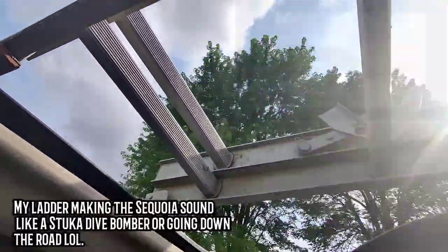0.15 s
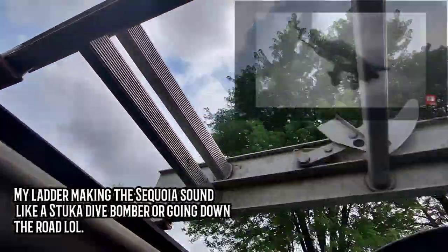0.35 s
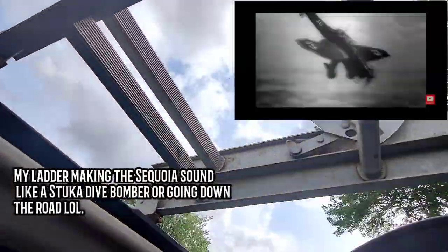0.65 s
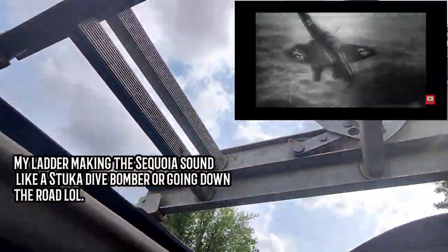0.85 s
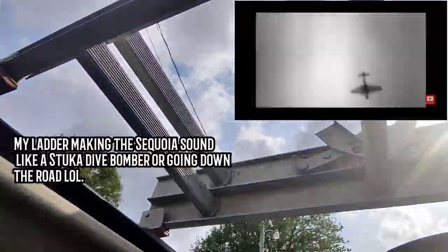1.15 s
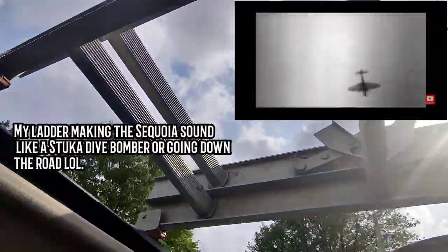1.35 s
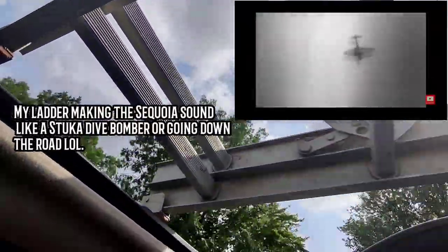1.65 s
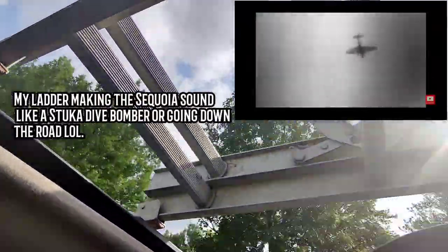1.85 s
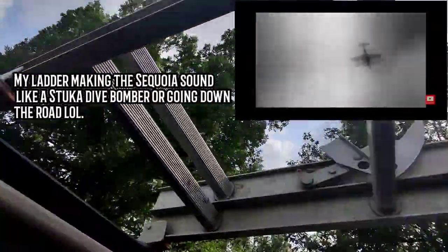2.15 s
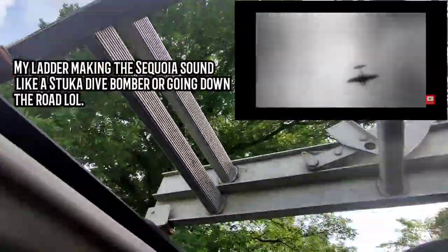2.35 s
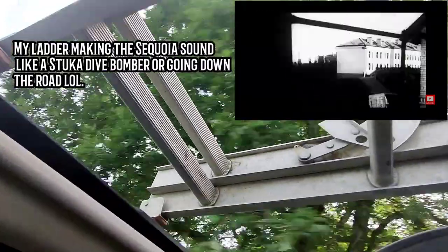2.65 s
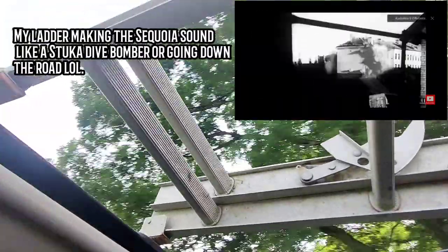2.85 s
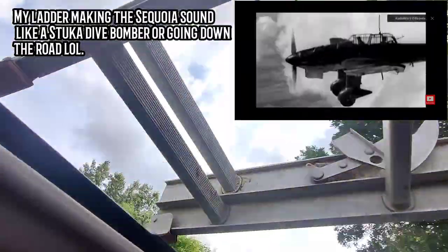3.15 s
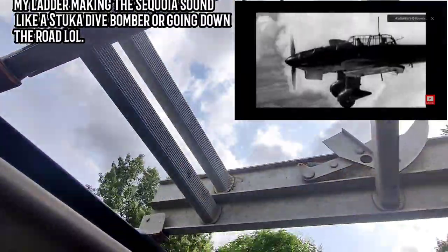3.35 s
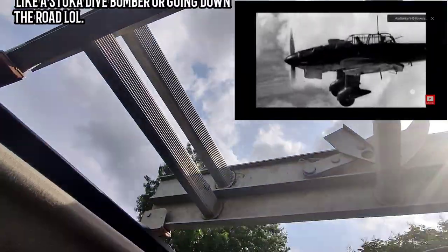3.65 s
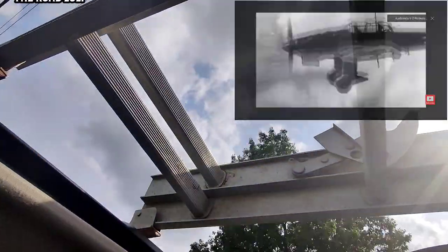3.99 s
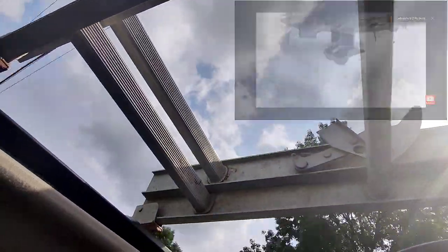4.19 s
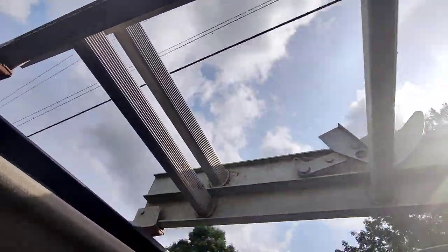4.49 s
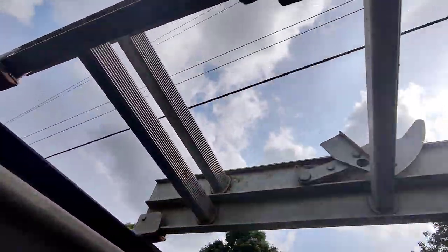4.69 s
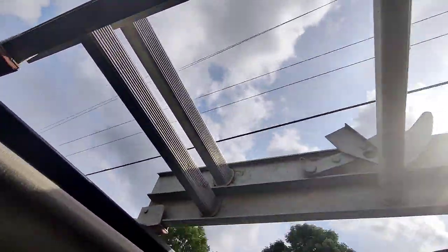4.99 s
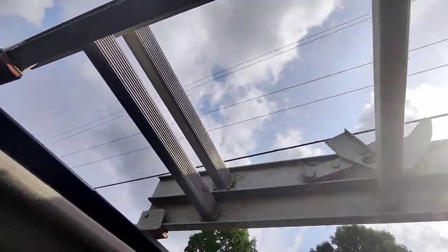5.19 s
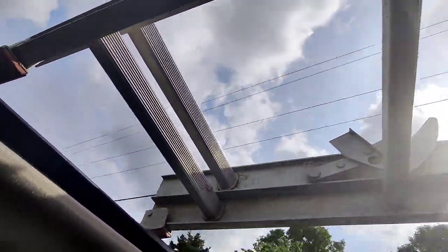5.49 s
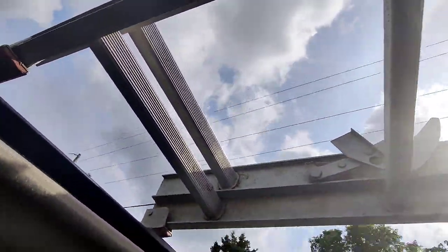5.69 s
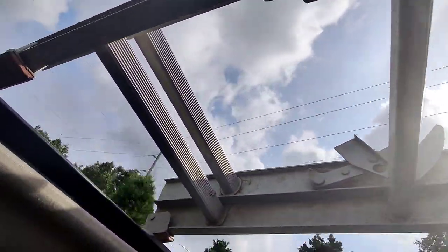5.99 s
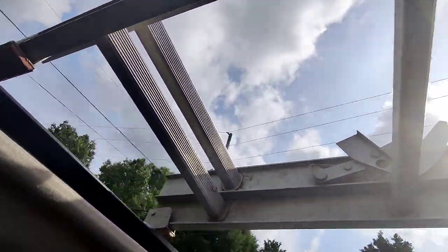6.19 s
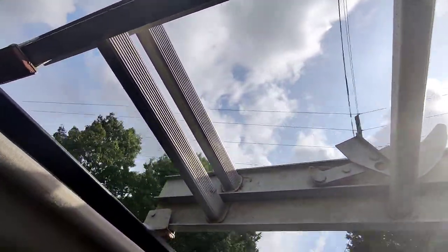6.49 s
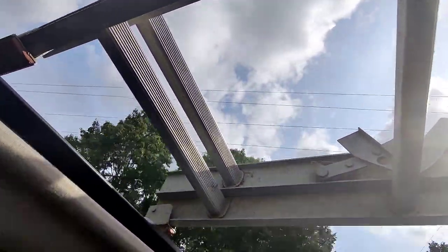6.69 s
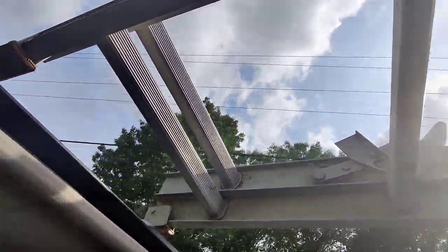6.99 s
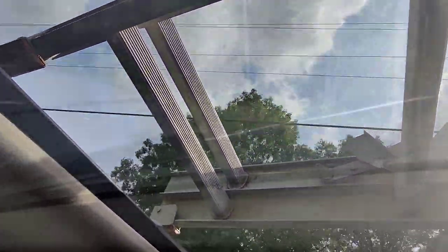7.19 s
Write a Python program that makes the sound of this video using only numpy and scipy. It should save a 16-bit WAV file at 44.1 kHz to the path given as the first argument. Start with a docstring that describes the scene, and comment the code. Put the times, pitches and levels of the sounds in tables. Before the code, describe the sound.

Wind through a ladder on a moving car's roof sings a steady, slowly beating mid-low whistle over road rumble, rushing air and increasingly hard wind thumps.

```python
"""Wind sings through the rungs of an aluminium ladder on the roof of a moving car, heard by a phone at the open sunroof.
From the start two rungs beat slowly in one whistle, two drifting tones with a fluttering octave, over tyre roar, rumble
and rushing air, all shaped noise. A low drone sinks as the car slows slightly, fades, and swells again past four seconds.
Gusts heave the air and dip the level; eddies buffet the two microphone ports as noise thumps, and from 1.5 s on some
slap them with one quick swing of pressure, most often after four seconds."""
import sys
import numpy as np
from scipy import signal
from scipy.fft import rfft, irfft
from scipy.io import wavfile
from scipy.ndimage import uniform_filter1d

SR = 44100
rng = np.random.default_rng(int(sys.argv[2]) if len(sys.argv) > 2 else 0)


def store_pcm(level_fs):
    """Save levels as 16-bit WAV."""
    pcm = np.round(np.clip(level_fs, -1, 1) * 32767).astype(np.int16)
    wavfile.write(sys.argv[1], SR, np.atleast_2d(pcm).T)


N = 323635
TIME = np.arange(N) / SR
FREQS = np.maximum(np.fft.rfftfreq(N, 1 / SR), 1)

# Gusts that heave the cabin air. Each row: centre in seconds, level in dB before the rumble's colour,
# length at half power in seconds, left minus right in dB, depth in dB of the dip in the whole sound.
GUSTS = [(.28, -21, 0.065, 10, 0), (0.99, -12.5, 0.04, -2, 0.5), (1.31, -16, .1, 3, 1),
         (1.535, -10, 0.11, -11, 5), (1.679, -8, 0.045, 5, 4.5), (1.778, -15, 0.053, 7, 4),
         (2.304, -10.5, 0.055, -4, 2), (2.97, -12, 0.044, -8, 1), (3.117, -28, .05, -8, 1.5),
         (3.272, -15, 0.13, 15.5, 1.5), (3.42, -19.5, 0.11, -10, 4), (3.619, -14.5, 0.062, 12, -2),
         (3.953, -14, 0.054, 1, 2), (4.067, -14.5, 0.094, -10.5, 4), (4.248, -16, 0.077, -7, 3),
         (4.599, -16.5, 0.1, -2, 3), (4.88, -12, 0.052, 0, 2), (5.114, -9, 0.057, -8, 3),
         (5.24, -11, 0.15, -5, 2.5), (5.362, -26, 0.048, -8, 2.5), (5.485, -16, 0.024, -10, 2.5),
         (5.816, -15.5, 0.045, -20, 4.5), (6.13, -14, 0.14, -10, 4.5), (6.571, -20, 0.0594, -15, 1.5),
         (6.706, -14, 0.076, -2, 4), (7.018, -15, 0.28, -1, 3.5)]


def undb(db):
    """Decibels to gain."""
    return 10 ** (np.asarray(db) / 20)


def curves(table):
    """The columns of a table, joined by straight lines in time."""
    s, *columns = np.transpose(table)
    return [np.interp(TIME, s, c) for c in columns]


def colour(table):
    """Gain at every frequency, one row for each dB column."""
    hz, *columns = np.transpose(table)
    return undb([np.interp(np.log(FREQS), np.log(hz), c) for c in columns])


def unit(x):
    """Scale to rms 1."""
    return x / np.sqrt(np.mean(x ** 2))


def even(x, size):
    """Hold the rms near 1 over every stretch of size samples."""
    return x / np.sqrt(uniform_filter1d(x ** 2, size=size, axis=-1))


def pan(db):
    """Left and right gains for a level difference."""
    return undb(np.array([[1], [-1]]) * db / 2)


def walk(rate):
    """Smooth random drift of rms 1, with little movement faster than rate in Hz."""
    return unit(irfft(rfft(rng.standard_normal(N)) / (1 + (FREQS / rate) ** 4), N))


def port_noise(gain, likeness, port_lag_s=0.00029):
    """Coloured noise at the two ports; likeness is the share of power in common, which reaches the right first."""
    shared, left, right = rfft(rng.standard_normal((3, N)))
    c = np.clip(likeness, 0, 1)
    arrival = np.exp(-2j * np.pi * FREQS * np.array([[port_lag_s], [0]]))
    common = np.sqrt(c) * shared * arrival
    separate = np.sqrt(1 - c) * np.array([left, right])
    return irfft(gain * (common + separate), N)


def swell(s, db, length, pan_db):
    """Power at the two ports of one rounded swell of wind; length spans its half-power points."""
    return (undb(db) * pan(pan_db)) ** 2 / (1 + (2 * (TIME - s) / length) ** 4)


def husk(phase, width_hz):
    """A narrow band of turbulence that rides on a tone."""
    return walk(width_hz) * np.cos(phase) + walk(width_hz) * np.sin(phase)


def road(centre_hz=235, width_hz=80, likeness=0.6, pan_db=-2.5):
    """The tyres roar in the cabin's low resonance: a noise band, louder on coarse stretches of road."""
    # Roar of the tyres. Each row: time in seconds, level in dB.
    roar_levels = [(0, -33.5), (.9, -34.5), (1.9, -36), (2.3, -33.5), (3.2, -34), (3.9, -36), (4.4, -40.5),
                   (5.2, -40), (6.1, -34), (7.34, -39.5)]
    db, = curves(roar_levels)
    band = 1 / (1 + ((FREQS - centre_hz) / width_hz) ** 2) ** 2
    return unit(port_noise(band, likeness)) * undb(db) * pan(pan_db)


def rumble(steady_db=-19.5, steady_pan_db=-4.0, likeness=0.4, heave_db=-0.1, gust_top_hz=95):
    """Air in the cabin heaves with the turbulence over the opening; gusts swell only its deepest part."""
    # Colour of the rumble. Each row: frequency in Hz, relative level in dB (the noise is evened afterwards).
    rumble_colour = [(4, -32), (12, -6.5), (25, 7), (38, 11.5), (50, 2.5), (65, -13), (95, -9.5),
                     (135, -11.5), (180, -26), (300, -32), (600, -28), (2000, -81)]
    heave = heave_db * np.array([walk(1.9), walk(2.3)])
    steady = undb(steady_db + heave) * pan(steady_pan_db)
    gust_power = sum(swell(s, db, length, pan_db) for s, db, length, pan_db, _ in GUSTS)
    gusty = np.sqrt(steady ** 2 + gust_power)
    air = even(port_noise(colour(rumble_colour), likeness), size=4000)
    deep = irfft(rfft(air) / (1 + (FREQS / gust_top_hz) ** 4), N)
    return deep * gusty + (air - deep) * steady


def roof_echoes(echo_db=-19, decay_s=0.0098):
    """Fine ripple that close reflections from roof and ladder put on each port's response."""
    tail = rng.standard_normal((2, N)) * np.exp(-TIME / decay_s)
    tail = tail / np.sqrt(np.sum(tail ** 2) / 2)
    return np.abs(1 + undb(echo_db) * rfft(tail))


def rush(shared_hz=1100, likeness=0.65, flicker_db=0.49, swirl_db=1.0, swirl_hz=2200):
    """Broad noise of air over the opening, alike at both ports in the bass, coloured by each port's cavity."""
    # Gain of the rush over its colour. Each row: time in seconds, gain in dB.
    rush_levels = [(0, 1.7), (1.0, 1), (1.45, 3.5), (2, 1), (3, 2), (3.8, 3), (4.3, 1.5), (5.05, 3.5),
                   (5.6, 1.1), (6.1, 1.5), (6.6, 2), (7.34, 1.5)]
    # Colour before echoes, resonances and gain. Each row: frequency in Hz, left and right in dB per Hz.
    rush_colour = [(61.3, -45, -41), (157, -61.5, -51.5), (253, -61, -59), (347, -67.5, -61),
                   (476, -63.5, -61.5), (610, -66.5, -65.5), (884, -63.5, -61.5), (973, -68, -66.5),
                   (1660, -75, -74.5), (1970, -77.5, -76), (2780, -84.5, -79.5), (3700, -84, -79.5),
                   (5520, -82, -80.5), (7960, -87.5, -92.5), (13900, -99.5, -91.5)]
    # Resonances of the ports. Each row: centre in Hz, width in Hz, boost at left and at right in dB.
    port_modes = [(1690, 48, 5.5, 1), (1955, 68, 4.5, 0.5), (2250, 540, 3.5, 4), (2890, 350, 2.5, 3.5),
                  (6424, 1370, -2.5, 13.5), (7300, 670, 4, -1.5)]
    db, = curves(rush_levels)
    gain = colour(rush_colour) * roof_echoes()
    for hz, width, left_db, right_db in port_modes:
        peak = 1 / (1 + (2 * (FREQS - hz) / width) ** 2)
        gain = gain * undb(np.array([[left_db], [right_db]]) * peak)
    # sqrt(SR / 2) turns levels per Hz into gains on white noise
    air = port_noise(gain * np.sqrt(SR / 2), likeness / (1 + (FREQS / shared_hz) ** 4))
    # large eddies stir the low part; the hiss stays smooth
    low = irfft(rfft(air) / (1 + (FREQS / swirl_hz) ** 2), N)
    air = air - low + low * undb(swirl_db * walk(36))
    return air * undb(db + flicker_db * walk(28))


def hum(waver_hz=0.32, throb_db=1.4, cabin_hz=238, cabin_width_hz=7, cabin_db=-38, torn_db=-22):
    """A low drone that throbs and tears in the wind; its octave booms when it passes a cabin resonance."""
    # Low hum of the car. Each row: time in seconds, pitch in Hz, level in dB before the throb.
    drone_path = [(0, 124.2, -19.5), (.65, 123.5, -21), (.95, 123.3, -24.5), (1.12, 123.2, -22.5),
                  (1.48, 123, -22.5), (1.72, 122.5, -36), (2.15, 121.3, -26.5), (2.9, 120, -31),
                  (3.4, 118.8, -34), (4.0, 117, -37), (4.4, 115.7, -26.5), (5.0, 114.8, -19.5),
                  (5.6, 113.7, -21.5), (6.1, 112.8, -20.5), (6.6, 111.8, -22.5), (7.05, 110.2, -22.5),
                  (7.34, 110, -19.5)]
    hz, db = curves(drone_path)
    phase = 2 * np.pi * np.cumsum(hz + waver_hz * walk(5.3)) / SR
    drone = undb(db + throb_db * walk(31)) * (np.sin(phase) + undb(torn_db) * husk(phase, 45))
    resonance = 1 / np.hypot(1, 2 * (2 * hz - cabin_hz) / cabin_width_hz)
    boom = undb(cabin_db + 2.6 * walk(5.3)) * resonance * np.sin(2 * phase)
    return np.sqrt(2) * (drone + boom)


def eddy_force():
    """Pressure of all the eddies at each port, their powers summed."""
    # Eddies that strike a port. Each row: centre in seconds, level in dB before colour and trim,
    # length at half power in seconds, left minus right in dB.
    eddies = [(0.248, -23.5, 0.025, -10), (1.54, -30.5, 0.026, -20), (1.569, -23.5, 0.023, -23),
              (1.607, -18.5, 0.03, 1), (1.754, -24.5, 0.051, 5), (1.806, -22, 0.075, -8),
              (2.206, -24.5, 0.036, -16), (2.276, -26.5, 0.026, -10), (2.462, -25, 0.028, -9),
              (2.596, -28, 0.034, 14), (3.12, -28, 0.063, -12), (3.232, -33, 0.031, 7),
              (3.27, -31, 0.053, 9), (3.343, -27.5, 0.028, -7), (3.617, -28, 0.045, 6),
              (3.837, -31, 0.022, -14), (4.098, -23.5, 0.059, -17), (4.11, -26, 0.023, -18),
              (4.824, -23, 0.032, -6), (5.08, -25, .025, -9), (5.13, -24.5, 0.085, -5),
              (5.282, -23, 0.033, -4), (5.353, -31, 0.054, 10), (5.491, -24.5, .02, -20),
              (5.63, -22, 0.032, -11), (5.758, -22, 0.027, -11), (5.823, -19, 0.047, -13),
              (5.912, -23, .02, -9), (6.112, -24, 0.025, -14), (6.167, -22.5, 0.024, -18),
              (6.294, -17.5, 0.024, -5), (6.521, -26, 0.023, -13), (6.56, -27, 0.027, -13),
              (6.607, -25.5, 0.023, -17), (6.676, -20.5, 0.038, 15), (6.709, -20, 0.036, -13.5),
              (6.947, -21.5, 0.016, -16), (7.013, -23.5, 0.028, -12.5), (7.061, -22.5, 0.023, -17),
              (7.124, -25, 0.021, -18)]
    return np.sqrt(sum(swell(*eddy) for eddy in eddies))


def buffets(buffet_db=1.45, ragged_db=2.1, likeness=0.14, bright_hz=520, bright_db=-7, wake_s=0.046, wake_db=-9):
    """Each eddy is a short ragged thump of noise, mostly on one port, with a wake that tears higher after the hardest."""
    # Colour of the thumps. Each row: frequency in Hz, relative level in dB (the noise is evened afterwards).
    buffet_colour = [(15, -21), (50, 2.5), (95, 5.5), (200, -3), (320, -9), (600, -20.5), (1200, -37.5),
                     (2500, -62), (6000, -80)]
    force = eddy_force()
    wake = np.abs(irfft(rfft(force) / (1 + 2j * np.pi * FREQS * wake_s), N))
    air = even(port_noise(colour(buffet_colour), likeness), size=900)
    tearing = irfft(rfft(air) / (1 + (bright_hz / FREQS) ** 4), N)
    torn_air = air + undb(bright_db) * tearing * wake / wake.max()
    strength = np.hypot(force, undb(wake_db) * wake)
    return torn_air * strength * undb(buffet_db + ragged_db * walk(66))


def slaps(tear_s=0.0091, tear_hz=520, tear_width=0.91):
    """An eddy that breaks on a port shoves and sucks in one quick swing, and the flow tears briefly around it."""
    # Eddies with a hard front. Each row: centre in seconds, swing in dB (its peak lies about 4 dB lower),
    # time scale of the swing in seconds, level of the tearing in dB, left minus right in dB.
    breaking_eddies = [(1.523, -16, 0.0035, -33, -12), (1.591, -20, .003, -31, -15),
                       (4.073, -8, 0.0062, -33.5, -14), (4.087, -17, 0.0027, -22.5, -10),
                       (4.098, -7, .005, -36, -10), (4.125, -8.5, 0.0027, -39, -18),
                       (5.101, -11, 0.0046, -24, -6), (5.78, -15, 0.0062, -30, -14),
                       (5.814, -7, 0.0026, -34, -10), (5.842, -19, 0.0048, -34, -13),
                       (5.911, -14, 0.004, -35, -17), (6.569, -10, 0.0024, -33, -14),
                       (6.603, -16, .003, -33, -16), (6.676, -10, .0015, -30, 6.5),
                       (6.706, -16, .002, -32, -9), (6.727, -12, 0.0046, -38, -16),
                       (6.998, -21, .0025, -31, -11), (7.136, -6, 0.0023, -42, -17)]
    shove, power = 0, 0
    for s, db, width, tear_db, pan_db in breaking_eddies:
        passing = (TIME - s) / width
        swing = 2 * passing / (1 + passing ** 2) ** 2
        shove = shove - undb(db) * pan(pan_db) * swing
        power = power + swell(s, tear_db, tear_s, pan_db)
    band = 1 / (1 + ((FREQS / tear_hz - tear_hz / FREQS) / (2 * tear_width)) ** 2) ** 2
    return shove + even(port_noise(band, 0), size=900) * np.sqrt(power)


def beating(pull=0.17):
    """A second rung sings slightly flat and slips against the first; each port hears them cancel at its own moment."""
    # Beats, where the second rung opposes the first; the right port's times step back twice.
    # Each row: time at the left port and at the right port in seconds, strength of the second rung from 0 to 1.
    beats = [(-.06, .11, 0.46), (.675, 0.777, 0.9), (1.28, 1.42, 0.58), (2.33, 2.46, 0.84),
             (3.19, 3.26, 0.16), (3.61, 3.6, 0.48), (4.23, 4.1, 0.3), (4.75, 2.96, 0.13), (5.6, 5.8, 0.05),
             (5.88, 6.5, 0.18), (6.25, 6.3, 0.02), (6.75, 6.8, 0.17), (7.34, 7.43, 0.46)]
    left_s, right_s, strength = np.transpose(beats)
    cycles = 2 * np.pi * np.arange(len(beats))
    slip = np.array([np.interp(TIME, s, cycles) for s in (left_s, right_s)])
    second = np.array([np.interp(TIME, s, np.clip(strength, 0, 1)) for s in (left_s, right_s)])
    # the rungs pull on each other: they linger in step and hurry through the cancellation
    return 1 - second * np.exp(-1j * (slip + pull * np.sin(slip)))


def overtones(phase, side_phase, octave_db=-0.5, octave_flutter_db=1.0, slip_rad=0.36, husk_db=-7,
              husk_above_hz=15, side_octave_db=-11.0, third_db=-55, third_line_db=-19, pan_db=-3):
    """The octave and a faint twelfth feel the turbulence more than the fundamental: a flaring line in a husky band."""
    # The octave between flares. Each row: time in seconds, level in dB before trim and flutter.
    octave_levels = [(0, -47), (.6, -43), (1.9, -44.5), (2.3, -46), (3.1, -46), (4.3, -42), (5.1, -46.5),
                     (5.9, -36), (6.35, -57), (6.6, -38), (7.34, -48.5)]
    # Short flares when the flow hits the rungs hard.
    # Each row: centre in seconds, level in dB before trim and flutter, length at half power in seconds.
    flares = [(.22, -35, 0.23), (0.357, -36.5, .05), (0.622, -42, .05), (0.778, -40, .04),
              (0.892, -38, 0.056), (1.263, -36, 0.07), (1.41, -40, .05), (1.536, -35.5, 0.098),
              (1.695, -31.5, 0.033), (1.816, -36, .05), (2.03, -33, 0.037), (2.424, -34, 0.051),
              (2.708, -41, 0.081), (2.86, -43, 0.031), (2.994, -37, 0.038), (3.206, -34, 0.055),
              (3.328, -36, 0.032), (3.53, -35.5, .05), (3.676, -37.5, .035), (3.806, -35.5, 0.065),
              (4.01, -32.5, 0.085), (4.5, -30.5, 0.036), (4.622, -32, 0.064), (4.76, -38, 0.035),
              (4.851, -36.5, .05), (4.98, -33.5, 0.092), (5.157, -30.5, 0.14), (5.378, -31.5, 0.05),
              (5.472, -34, 0.045), (5.638, -35.5, 0.086), (5.788, -37, 0.07), (5.95, -41, .04),
              (6.039, -37, 0.06), (6.27, -31, 0.04), (6.43, -38.5, .04), (6.5, -34.5, 0.078),
              (6.831, -38, 0.061), (6.962, -38, 0.065), (7.1, -34, 0.047), (7.2, -37, 0.07)]
    steady_db, = curves(octave_levels)
    flare_power = sum(swell(s, db, length, 0)[0] for s, db, length in flares)
    strength = np.sqrt(undb(steady_db) ** 2 + flare_power)
    octave_gain = undb(octave_db + octave_flutter_db * walk(4.2))
    octave = np.sqrt(2) * octave_gain * np.sin(2 * phase + slip_rad * walk(22))
    twelfth = np.sqrt(2) * undb(third_line_db) * np.sin(3 * phase + slip_rad * walk(22))
    # part of the husk comes from all along the rungs, so it differs between the ports
    husk_phase = 2 * phase + 2 * np.pi * husk_above_hz * TIME
    band = np.array([husk(husk_phase, 20) for _ in range(2)]) + husk(husk_phase, 6.7)
    side_band = undb(side_octave_db) * husk(2 * (phase + side_phase), 24)
    band = undb(husk_db) * band / np.sqrt(2) + side_band
    third_band = undb(third_db) * (1.2 * husk(3 * phase, 32.0) + husk(3 * phase + side_phase / 2, 21))
    # the husk follows only the slower swells
    slow_strength = uniform_filter1d(strength, size=15000)
    return ((octave + twelfth) * strength + band * slow_strength + third_band) * pan(pan_db)


def whistle(pan_db=-1.3, side_hz=27.2, side_flutter_db=3.0, waver_hz=0.97, flutter_db=0.72, lead_rad=0.52, husk_db=-30):
    """Vortices shed by the rungs lock to their air resonance: a nearly pure tone that wavers with the flow."""
    # The leading rung. Each row: time in seconds, pitch in Hz, level in dB before flutter and beating.
    rung_path = [(0, 423.6, -20.5), (.29, 424, -21), (.68, 423.4, -19.5), (1.0, 423, -24.5),
                 (1.27, 423.8, -17.5), (1.52, 422.2, -18), (1.72, 422, -19.5), (2.08, 422.5, -20),
                 (2.68, 421, -21), (3.01, 423.3, -18.5), (3.49, 422, -21), (4.27, 420.3, -22.5),
                 (4.55, 422.1, -19.5), (5.26, 422.2, -19), (5.65, 421, -21.5), (6.22, 421, -23),
                 (6.42, 417.7, -22.5), (6.62, 422.7, -19), (6.99, 421, -23), (7.34, 420.5, -23)]
    # The burr's tone. Each row: time in seconds, level in dB before flutter.
    burr_levels = [(0, -34), (.4, -33), (.75, -42), (1.2, -36), (1.38, -29), (1.53, -37), (1.7, -36),
                   (2.0, -49), (2.4, -37), (2.9, -37), (3.6, -46), (3.88, -34), (4.2, -43.5), (5.1, -39),
                   (5.8, -40), (7.34, -38.5)]
    hz, db = curves(rung_path)
    burr_db, = curves(burr_levels)
    phase = 2 * np.pi * np.cumsum(hz + waver_hz * walk(37.5)) / SR
    # the left port leads in phase
    at_ports = np.sqrt(2) * np.exp(1j * (phase + np.array([[1], [0]]) * lead_rad))
    tone = beating() * undb(db + flutter_db * walk(15))
    # a weaker tone and a breathy band just above the main one give it a fast burr
    side_phase = 2 * np.pi * np.cumsum(side_hz + 2.6 * walk(17.8)) / SR
    burr = undb(burr_db + side_flutter_db * walk(3.6)) * np.exp(1j * side_phase)
    band = undb(husk_db) * np.abs(tone) * husk(phase + side_phase, 55)
    fundamental = np.imag(at_ports * (tone + burr)) + band
    return fundamental * pan(pan_db) + overtones(phase, side_phase)


def upset(knock_db=-2.0, settle_s=0.078):
    """Gain of the whistle: a hard eddy disturbs the vortices for a moment, then they lock again."""
    force = irfft(rfft(eddy_force().sum(axis=0)) / (1 + 2j * np.pi * FREQS * settle_s), N)
    return undb(knock_db * force / force.max())


def dips(lag_s=0.006, attack_s=0.081, recovery_s=0.35):
    """Gain of the whole sound: it drops quickly around a hard gust and comes back slowly."""
    dips_db = []
    for s, *_, dip_db in GUSTS:
        since = TIME - lag_s - s
        drop = np.clip(since / attack_s + .5, 0, 1)
        dips_db.append(dip_db * drop * np.exp(-np.maximum(since, 0) / recovery_s))
    # the deepest dip wins
    return undb(-np.max(dips_db, axis=0))


def scene():
    """Ladder, car and wind together."""
    car = road() + rumble() + hum()
    wind = rush() + buffets() + slaps()
    return (car + wind + whistle() * upset()) * dips()


def record(dry, ceiling=.9, hardness=8, top_hz=14000, fade_s=.003):
    """The hardest blows overload the phone and are flattened; the top is cut."""
    flattened = dry / (1 + np.abs(dry / ceiling) ** hardness) ** (1 / hardness)
    soft_ends = np.clip(np.minimum(TIME, TIME[-1] - TIME) / fade_s, 0, 1)
    top_cut = signal.ellip(8, .2, 70, top_hz, fs=SR, output="sos")
    return signal.sosfilt(top_cut, flattened * soft_ends)


dry = scene()
out = record(dry)
store_pcm(out)
```